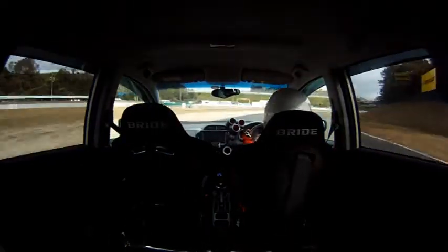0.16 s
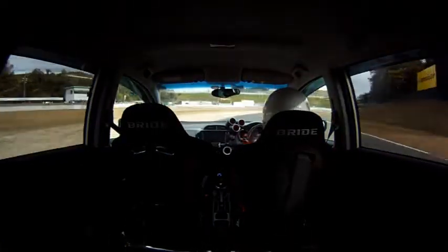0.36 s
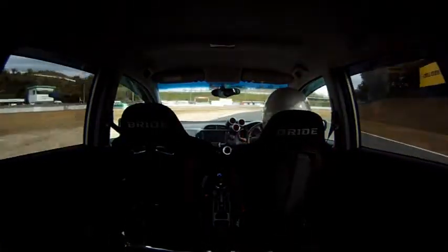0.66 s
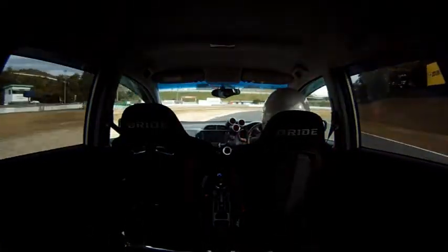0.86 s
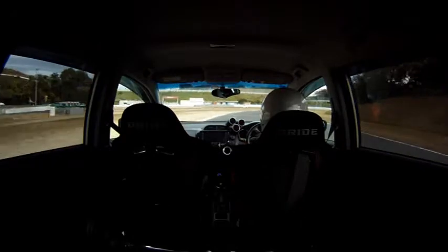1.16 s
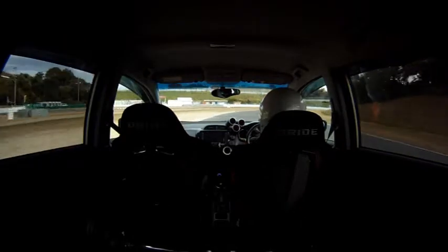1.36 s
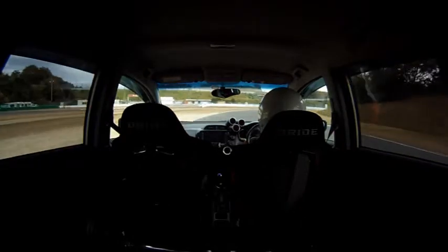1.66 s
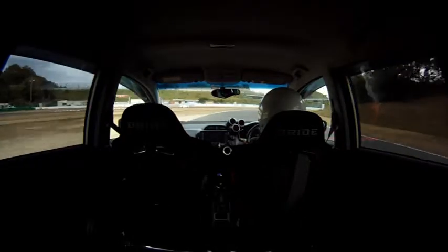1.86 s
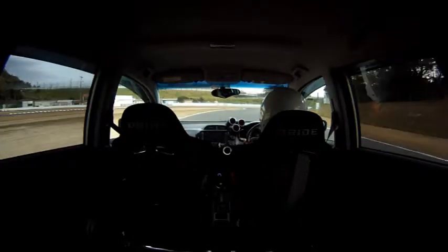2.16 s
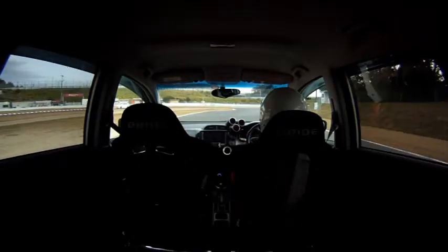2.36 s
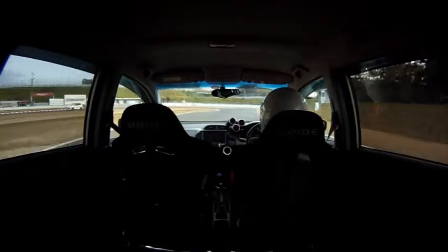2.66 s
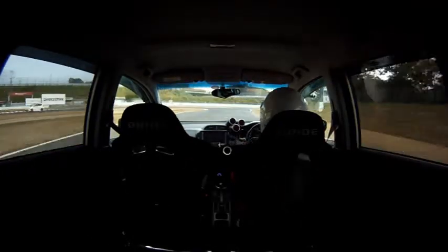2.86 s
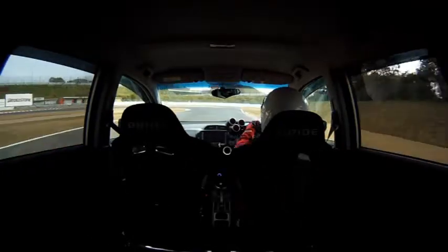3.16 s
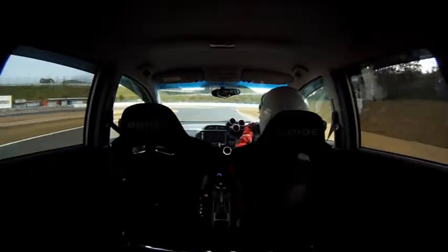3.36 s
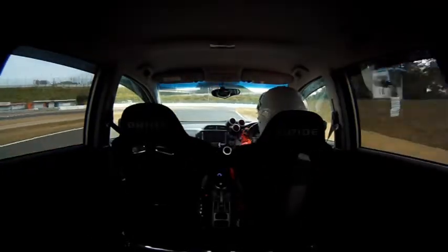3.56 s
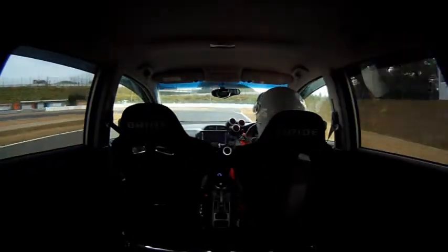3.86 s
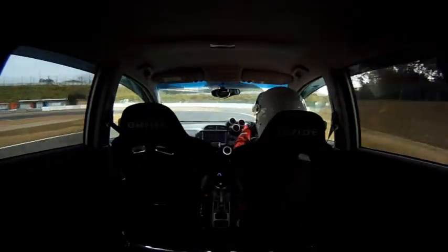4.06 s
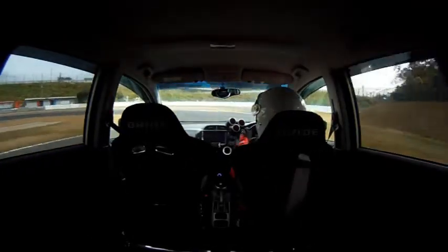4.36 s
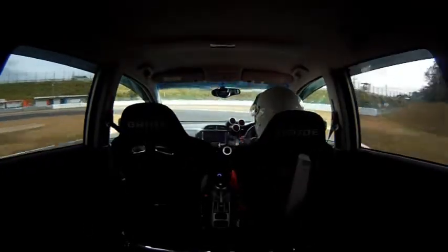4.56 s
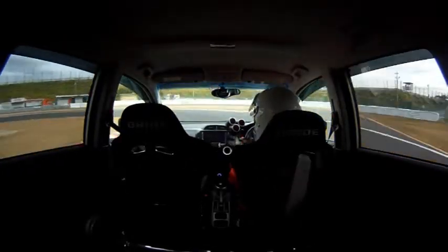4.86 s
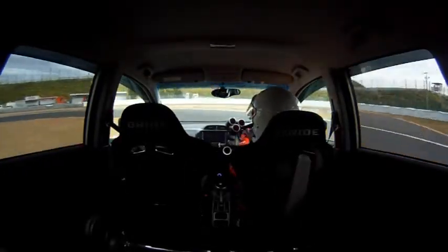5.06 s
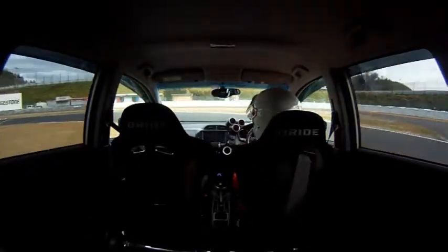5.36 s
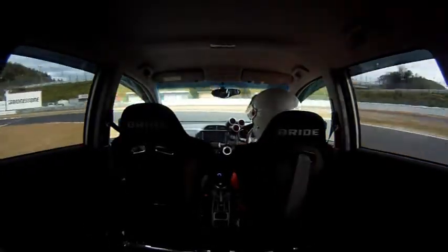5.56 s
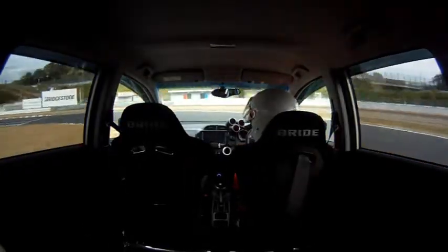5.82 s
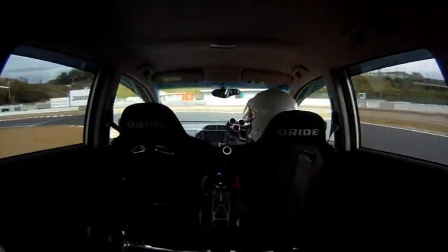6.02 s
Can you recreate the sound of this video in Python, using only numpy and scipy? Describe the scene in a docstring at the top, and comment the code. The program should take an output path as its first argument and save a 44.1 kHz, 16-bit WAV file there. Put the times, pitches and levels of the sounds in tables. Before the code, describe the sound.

A small four-cylinder car runs on a race track, heard from behind the seats in a boomy cabin. From the start the engine holds full throttle, its strong drone rising slowly in pitch over deep road rumble, body roar and a light intake hiss. A faint metal clink comes at about 0.3 seconds, and loose trim rattles lightly around 2 seconds. At 3 seconds the driver lifts off: the engine note dips, the drive line thumps, and a sharp rattle comes with a swell of road roar. The revs then fall steadily to the end. Near 4.6 seconds the engine briefly drops away and a second, stronger thump follows, then a flurry of trim rattles from about 4.9 to 5.3 seconds. From 5.5 seconds a faint, rapid buzzing tick joins the lower engine note as the car brakes, lasting until about 6 seconds.

```python
"""A small four-cylinder car on a race track, heard from behind the seats. At full throttle the firing
orders climb and ring the cabin over road rumble, body roar and intake hiss; metal clinks and loose trim
rattles. At 3 s the driver lifts, the drive line thumps and the revs fall across rough patches of road.
Near 5 s come a second thump and a flurry of rattles, then something ticks under braking.
Throughout, a slow sample-and-hold mirrors the tones around its 12 kHz rate."""
import sys
import numpy as np
from scipy import signal
from scipy.fft import rfft, irfft
from scipy.io import wavfile
from scipy.ndimage import uniform_filter1d

SR = 44100
rng = np.random.default_rng(int(sys.argv[2]) if len(sys.argv) > 2 else 0)


def materialize(psi):
    """Save the field psi as 16-bit PCM at rate SR to the path in sys.argv[1].

    A 1-D psi becomes a single channel; in a 2-D psi each row is a channel.
    """
    bounded = np.clip(np.atleast_2d(psi).T, -1, 1)
    quanta = np.round(bounded * 32767).astype(np.int16)
    wavfile.write(sys.argv[1], SR, quanta)


N = 272979
TIME = np.arange(N) / SR
FREQ = np.arange(N // 2 + 1) * SR / N + 1e-3

# cabin and panel resonances: pitch_hz, width_hz, gain_db
CABIN_MODES = [(60, 400, -7), (236.3, 44, 4), (295.2, 25, 0.5), (311.2, 27.2, 1), (378.4, 13.5, 1.5),
               (452, 49, -4.5), (524, 45.5, -4), (625.5, 37.4, 0), (691.3, 31.5, -2.5), (904, 10, -3.5),
               (804.5, 20, -9.5), (1062, 22, -6), (1160, 25, -11), (1258.4, 20, -8.5), (1496, 48, -18.5)]


def undb(db):
    """Gain of a level in dB."""
    return np.exp(np.asarray(db) * (np.log(10) / 20))


def unit(x):
    """Scale to rms 1."""
    return x / np.sqrt(np.mean(x ** 2))


def curves(table):
    """One automation curve for each column after the time."""
    times, *columns = np.transpose(table)
    return [np.interp(TIME, times, column) for column in columns]


def drift(rate_hz):
    """Random steps, smoothed twice into a wobble of rms 1."""
    hold = int(SR / rate_hz)
    steps = np.repeat(rng.standard_normal(N // hold + 1), hold)
    return unit(uniform_filter1d(uniform_filter1d(steps, hold), hold)[:N])


def response(modes, hz):
    """Summed complex gain of damped resonances, neighbours in opposite phase."""
    return sum((-1) ** k * undb(db) * 1j * hz * width / (pitch ** 2 - hz ** 2 + 1j * hz * width)
               for k, (pitch, width, db) in enumerate(modes))


def ring(x, modes):
    """Send a signal through resonances."""
    return irfft(rfft(x) * response(modes, FREQ), N)


def noise(spectrum):
    """Noise of the given colour, rms 1."""
    hz, db = np.transpose(spectrum)
    colour = undb(np.interp(np.log(FREQ), np.log(hz), db))
    return unit(irfft(rfft(rng.standard_normal(N)) * colour, N))


def road_levels():
    """Faders in dB for rumble, roar and hiss, pushed up by each rough patch."""
    # the noise bed along the track: time_s, rumble_db, roar_db, hiss_db
    bed = [(0, -18, -28.5, -43.5), (0.3, -32.5, -26.5, -42), (0.9, -34, -28.5, -45),
           (1.2, -33.5, -29.5, -46), (1.5, -33.5, -30.5, -43), (1.7, -26, -24, -41.5),
           (2.2, -26.5, -22.5, -37.5), (2.6, -22.5, -24, -40.5), (2.95, -27, -25.5, -44),
           (3.9, -33.5, -30, -47.5), (4.25, -29.5, -32, -46), (4.5, -23.5, -27, -47.5),
           (4.85, -26.5, -23.5, -46.5), (5.1, -24, -26.5, -48.5), (5.8, -25.5, -29, -55),
           (6.19, -28, -22, -49.5)]
    # rough patches: centre_s, half_length_s, rumble_rise_db, roar_rise_db
    patches = [(.62, 0.17, 9, 1.5), (3.193, 0.16, 11, 12.5), (4.669, 0.083, 0, 8), (5.447, 0.23, 0, 0.5),
               (6.076, 0.046, 7, 1)]
    rumble_db, roar_db, hiss_db = curves(bed)
    for centre_s, half_length_s, rumble_rise_db, roar_rise_db in patches:
        swell = np.exp(-((TIME - centre_s) / half_length_s) ** 2)
        rumble_db += rumble_rise_db * swell
        roar_db += roar_rise_db * swell
        hiss_db += 0.54 * roar_rise_db * swell
    return rumble_db, roar_db, hiss_db


def road_rumble(level_db):
    """The road makes a deep, wavering rumble."""
    # rumble colour: pitch_hz, gain_db
    colour = [(18, -17.5), (30, 7), (55, 8), (90, -3), (130, -4.5), (200, -52)]
    return undb(level_db + 2.0 * drift(7)) * noise(colour)


def body_roar(firing_hz, level_db):
    """Panels roar through the cabin modes, brighter as the revs rise."""
    # colours of the low and the upper roar: pitch_hz, gain_db
    low_colour = [(70, -21), (110, -10), (180, 6), (260, -6), (400, -3.5), (520, -14), (800, -50.5)]
    upper_colour = [(300, -47.5), (480, 5), (680, -4.5), (800, -12.5), (1200, -17), (1700, -42)]
    upper_db = -0.6 + 7 * np.log2(firing_hz / 200)
    roar = 2 * noise(low_colour) + undb(upper_db + 1.8 * drift(13)) * noise(upper_colour)
    return (0.28 * roar + 0.24 * ring(roar, CABIN_MODES[1:])) * undb(level_db + 1.4 * drift(15))


def intake_hiss(firing_phase, level_db):
    """Intake air puffs once a firing, and small metal fittings sing in it."""
    # air colour: pitch_hz, gain_db
    colour = [(900, -3), (1300, -2.5), (1900, -6), (2300, -5), (3100, -6.5), (3650, -14.5), (4900, -16),
              (5700, -26.5), (7000, -63.5)]
    # resonances of the fittings: pitch_hz, width_hz, gain_db
    fittings = [(2042, 8.2, 7.5), (2224, 18, 10), (2888, 41, 1.5), (3116, 25, 10), (3260, 26, 1.5)]
    puff = (1 + 0.18 * np.sin(firing_phase) + 0.072 * np.sin(firing_phase / 2)) * undb(1.2 * drift(40))
    hiss = puff * noise(colour)
    # a swell placed at 4.26 s, where the falling engine shakes the fittings most
    shaken_db = 7.0 * np.exp(-((TIME - 4.26) / 0.09) ** 2) + 2.0 * drift(6)
    hiss += undb(shaken_db) * ring(hiss, fittings)
    return 0.73 * undb(level_db) * hiss / np.median(np.abs(hiss))


def drive_thumps():
    """Short pushes through the drive line ring the cabin."""
    # jolts: centre_s, level_db
    jolts = [(3.155, -4.5), (4.674, 2)]
    pushes = sum(undb(db) * np.exp(-((TIME - centre_s) / .0012) ** 2) for centre_s, db in jolts)
    return ring(pushes, CABIN_MODES)


def trim_rattles():
    """Bumps knock loose trim into bursts of chatter that ring and die away, the treble sooner."""
    # knocks: start_s, level_db, treble_offset_db, clack_offset_db
    knocks = [(0.254, -38, -4, -8), (0.58, -34, -5, 4), (1.8476, -31.5, -1.5, -7), (2.1385, -25.5, -17, 0),
              (2.1768, -29, -1.5, -7), (2.22, -39, 2.5, -9), (2.41, -37, -1, -7), (2.93, -42, 1.5, -8),
              (3.03, -42, 3, -9), (3.0591, -43, 6.5, -3), (3.1061, -31, 3, -1), (3.1822, -18.5, 5.5, 0),
              (4.8728, -20, -2.5, 2), (4.8993, -32, -3, -11), (4.9317, -42, 0, 3), (4.9895, -25, -8, -14),
              (5.0946, -28.5, -4, 2), (5.1229, -18, -12, -1.5), (5.1606, -21, -3, 4),
              (5.196, -22.5, -7, -2), (5.244, -24.5, -7, -15), (5.307, -40.5, 5.5, -15)]
    # trim resonances (two for the clack, the rest for the body), then its treble edge:
    # pitch_hz, width_hz, gain_db
    trim_modes = [(1900, 140, 3.5), (2300, 160, 5.5), (2950, 300, 7), (3390, 170, 3), (3980, 280, -1)]
    edge_modes = [(4700, 4300, 1.5)]
    attack_s, body_t60_s, edge_t60_s = 0.0025, 0.13, 0.084
    body, edge, clack = np.zeros((3, N))
    for start_s, level_db, treble_db, clack_db in knocks:
        age = np.clip(TIME - start_s, 0, None)
        attack = 1 - np.exp(-age / attack_s)
        knock = undb(level_db - 60 * age / body_t60_s) * attack
        body += knock
        clack += undb(clack_db) * knock
        edge += undb(level_db + treble_db - 60 * age / edge_t60_s) * attack
    chatter = rng.standard_normal(N) * undb(2.0 * drift(250))
    bands = [(clack, trim_modes[:2]), (body, trim_modes[2:]), (edge, edge_modes)]
    return 1.15 * sum(ring(envelope * chatter, modes) for envelope, modes in bands)


def metal_clink():
    """One strike on metal rings a few decaying modes."""
    # ringing modes: pitch_hz, gain_db, t60_s
    modes = [(2090, -8, .1), (2695, 0, .16), (3475, -6, .2), (4955, -10.5, .22)]
    start_s, level_db = .254, -34
    age = np.clip(TIME - start_s, 0, None)
    return sum(undb(level_db + db - 60 * age / t60) * np.sin(2 * np.pi * hz * age)
               for hz, db, t60 in modes)


def brake_ticks():
    """A steady buzz of ticks under braking, alternately strong and weak, each a short noisy ring."""
    # tick strength: time_s, level_db, weak_tick_offset_db
    strength = [(5.3, -60, -17), (5.47, -52, -20), (5.58, -42, 0), (5.76, -45.5, -20), (5.82, -44.5, -6),
                (6.19, -37, -1.5)]
    # resonances of the ticking part: pitch_hz, width_hz, gain_db
    modes = [(2630, 270, -4), (3560, 370, -1.5), (4200, 280, -4.5), (4776, 340, 2), (5665, 300, -4)]
    rate_hz, strong_tick_s, start_s = 94.9, 5.516, strength[0][0]
    level_db, weak_db = curves(strength)
    cycles = (TIME - strong_tick_s) * rate_hz
    tick = np.floor(cycles).astype(int)
    scatter_db = 1.5 * rng.standard_normal(N // 400)[tick - tick[0]]
    tick_db = level_db + weak_db * (tick % 2) + scatter_db
    envelope = np.exp(-(cycles % 1) / 0.27) * (TIME > start_s)
    return undb(tick_db) * ring(6.55 * envelope * rng.standard_normal(N), modes)


def drive_slack():
    """The dip in dB as the drive goes slack and the engine note drops away."""
    # slack spells: start_s, end_s, drop_db
    spells = [(2.99, 3.33, 7), (3.9, 3.956, 2.5), (4.497, 4.667, 9.5), (6.07, 6.11, 10)]
    fade_s = .04
    fade = lambda at_s: np.clip((TIME - at_s) / fade_s + .5, 0, 1)
    return sum(drop_db * (fade(start_s) - fade(end_s)) for start_s, end_s, drop_db in spells)


def drive_surge():
    """The swing in firing rate, in Hz, as the drive line winds up and lets go."""
    centre_s, span_s, rate_hz, depth_hz = 0.567, 0.23, 3.6, 2.5
    t = TIME - centre_s
    return depth_hz * np.exp(-(t / span_s) ** 2) * np.cos(2 * np.pi * rate_hz * t)


def revs():
    """Firing rate and the levels of tone and orders; slack takes most from the orders."""
    # throttle, lift and braking: time_s, firing_hz, tone_db, orders_over_tone_db
    run = [(0, 168.6, -14, -15.5), (0.3, 177.5, -15, -10), (0.65, 181.5, -15.5, -11), (0.9, 187, -14, -14),
           (1.45, 198.1, -14, -13), (1.65, 203, -16, -7.5), (2, 210.3, -16.5, -4.5),
           (2.3, 214.3, -16, -8.5), (2.86, 225.9, -13.5, -10.5), (2.94, 223.9, -16, -12.5),
           (3, 218.2, -14.5, -17.5), (3.5, 211, -12.5, -12), (3.65, 199.7, -12.5, -14),
           (4.05, 177, -13.5, -18.5), (4.45, 160.7, -13.5, -18.5), (4.68, 153.8, -16, -20),
           (4.8, 139.1, -16, -14), (5.1, 133.4, -15.5, -6.5), (5.5, 126.7, -14, -12.5),
           (6.19, 112.4, -16.5, -11)]
    firing_hz, tone_db, orders_db = curves(run)
    slack_db = drive_slack()
    return firing_hz + drive_surge(), tone_db - slack_db, orders_db - 1.2 * slack_db


def engine(firing_hz, tone_db, orders_db):
    """A strong firing tone, with orders that swell as they sweep through the cabin resonances."""
    # engine orders: multiple_of_firing_rate, gain_db
    orders = [(.25, -8), (.5, -5), (1.5, 5.5), (2, 3), (2.5, -5.5), (3, -0.5), (3.5, -8), (4, -1.5),
              (4.5, -8), (5, -2), (5.5, -6), (6, -7.5), (6.5, -10), (7, -4.5)]
    # timbre with load: time_s, fractional_order_db, slope_db_per_order, scatter_rad_per_order
    load = [(0, 0, 0, .02), (2.9, 0, 0, .02), (3.0, -8, -.8, .08), (4.4, -9, -1.5, .11), (4.9, -8, -3, .22),
            (6.19, -8, -3.5, .28)]
    fractional_db, slope_db, scatter_rad = curves(load)
    phase = 2 * np.pi * np.cumsum(firing_hz * (1 + 0.0011 * drift(25.208))) / SR
    tones = undb(tone_db + .5 * drift(30)) * np.sqrt(2) * np.sin(phase)
    # early and late firings smear the higher orders most
    ragged_phase = phase + scatter_rad * drift(60)
    for order, gain_db in orders:
        flutter_db = 2.0 * drift(14) + 2.3 * drift(3.48)
        level_db = tone_db + orders_db + gain_db + slope_db * order + flutter_db
        if order % 1:
            level_db += fractional_db
        cabin_gain = np.interp(TIME, TIME[::64], np.abs(response(CABIN_MODES, order * firing_hz[::64])))
        tones += undb(level_db) * cabin_gain * np.sin(order * ragged_phase + 2 * np.pi * rng.random())
    return tones, phase


def scene():
    """The mono mix inside the cabin."""
    firing_hz, tone_db, orders_db = revs()
    tones, firing_phase = engine(firing_hz, tone_db, orders_db)
    rumble_db, roar_db, hiss_db = road_levels()
    bed = body_roar(firing_hz, roar_db) + intake_hiss(firing_phase, hiss_db) + road_rumble(rumble_db)
    return (tones + bed + drive_thumps() + trim_rattles() + metal_clink() + brake_ticks())[None]


def record(dry):
    """Low-passed sound, sampled at 12 kHz and held, gains mirror tones; the very top is then cut."""
    input_top_hz, output_top_hz, hold_steps = 5650, 15400, 4
    soft = signal.sosfilt(signal.butter(10, input_top_hz, fs=SR, output="sos"), dry)
    slow = signal.resample_poly(soft, 40, 147, axis=1)  # 12 kHz
    stairs = np.repeat(slow, hold_steps, axis=1)  # 48 kHz
    held = signal.resample_poly(stairs, 147, 160, axis=1)[:, :N]  # back to SR
    return signal.sosfilt(signal.ellip(10, .2, 70, output_top_hz, fs=SR, output="sos"), held)


dry = scene()
out = record(dry)
materialize(out)
```